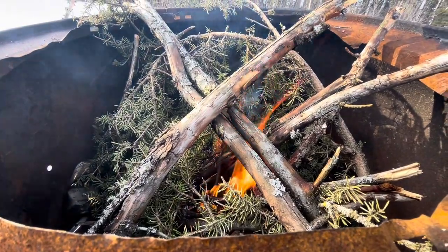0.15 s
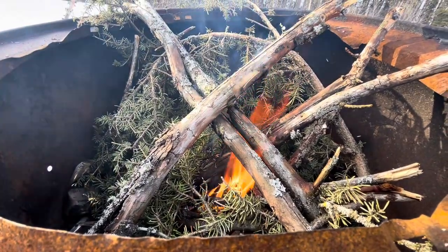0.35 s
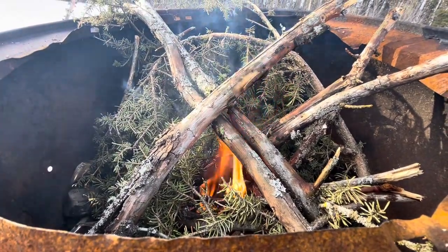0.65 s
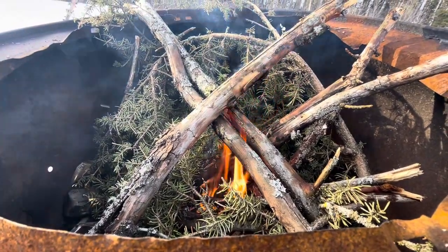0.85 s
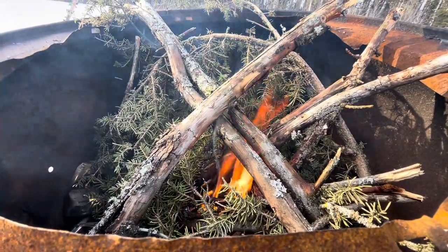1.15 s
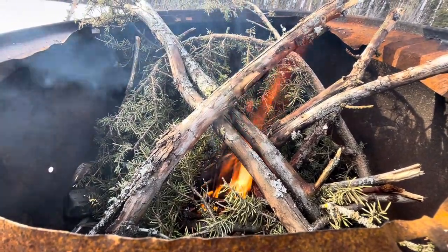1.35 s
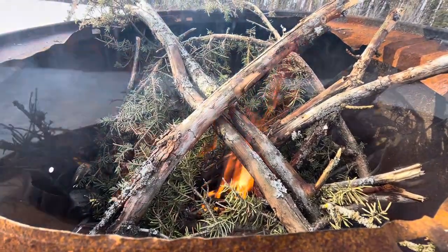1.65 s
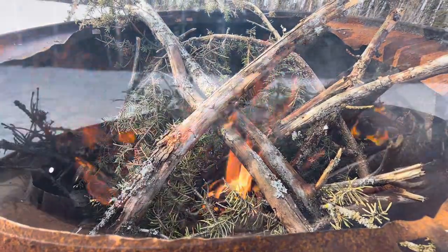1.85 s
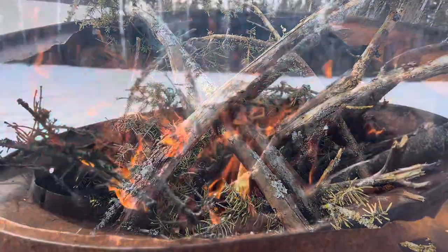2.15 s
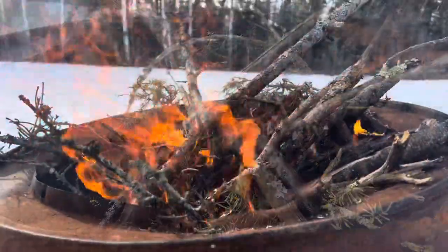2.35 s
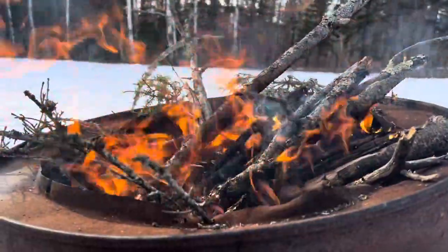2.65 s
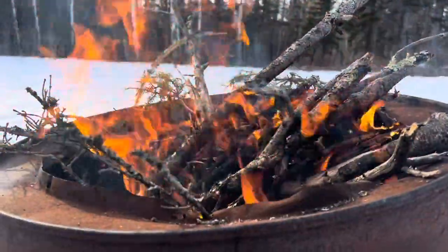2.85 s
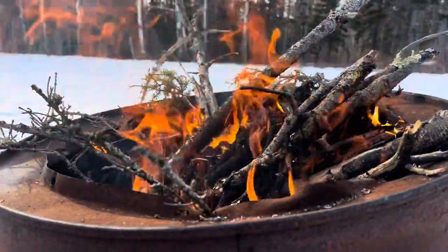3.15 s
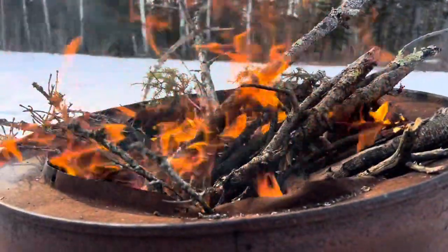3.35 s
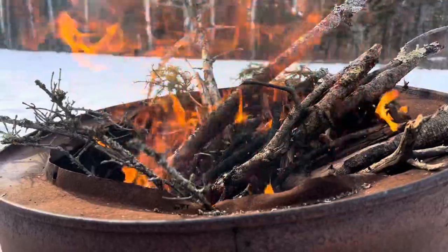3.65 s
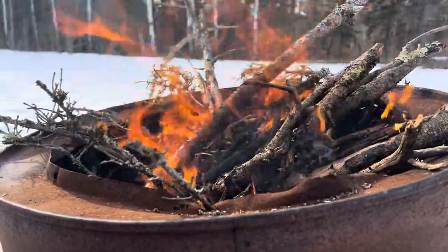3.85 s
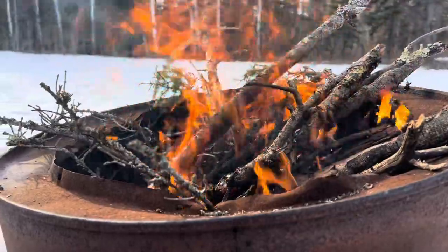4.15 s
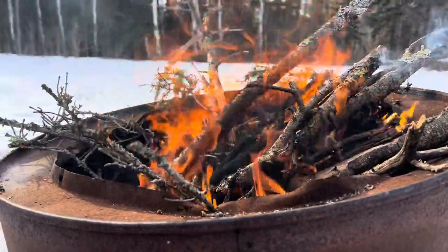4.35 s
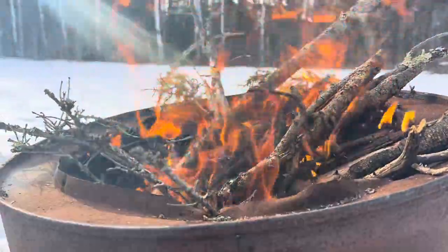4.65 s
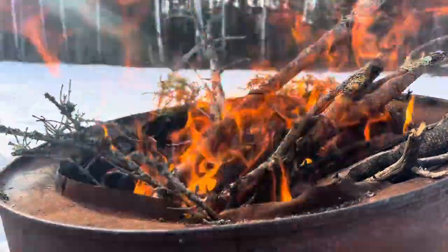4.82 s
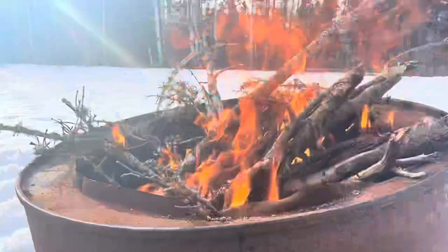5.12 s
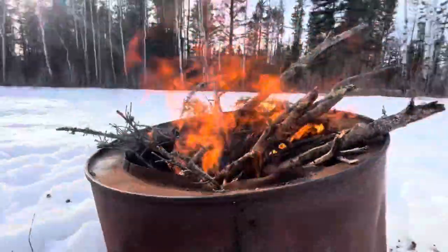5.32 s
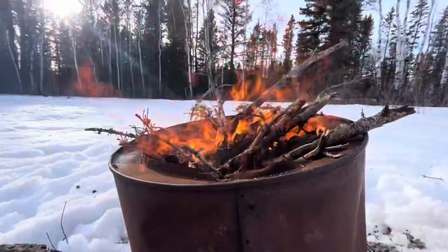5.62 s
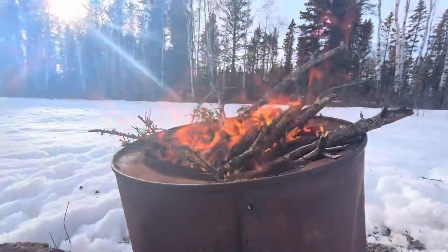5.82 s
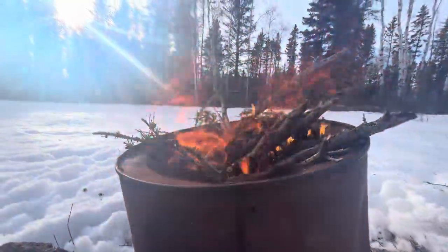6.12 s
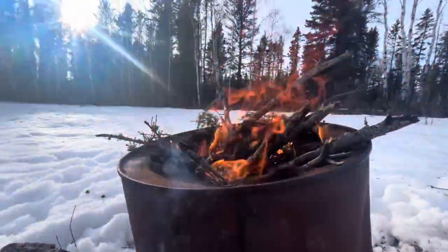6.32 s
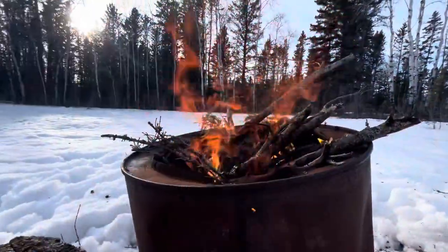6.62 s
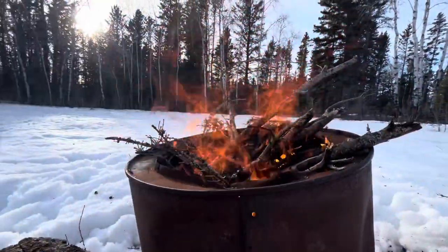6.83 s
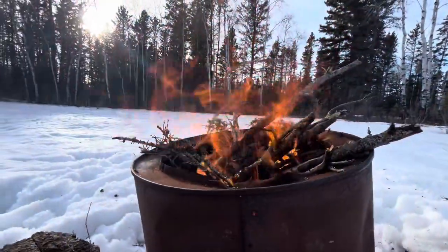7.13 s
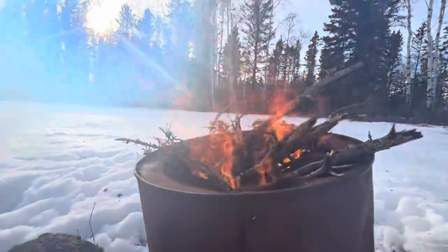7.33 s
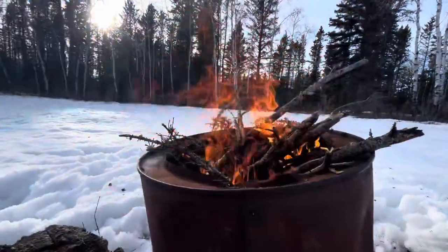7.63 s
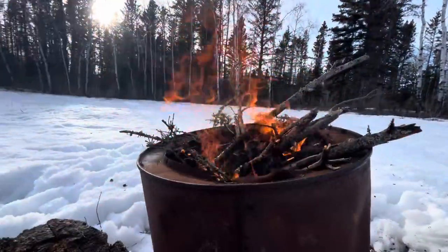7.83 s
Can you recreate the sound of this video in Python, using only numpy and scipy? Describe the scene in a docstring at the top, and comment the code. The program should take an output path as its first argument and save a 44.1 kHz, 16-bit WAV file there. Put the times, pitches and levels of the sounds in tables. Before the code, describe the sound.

A fire of green branches in a steel barrel outdoors, heard in close stereo. From 0 to 1.9 s it is small: a faint steady sap hiss, sparse sharp snaps and needle ticks, dull twig knocks and low soft thumps of air in the barrel, with stronger snaps near 0.9 and 1.5 s. Around 2 s the sound blends into a bigger blaze: loud pops at 2.05 and 2.36 s, dense irregular crackle, airy draught and a deep fluttering roar. The roar gusts from 3.4 s and peaks about 4.1-4.5 s, then drops. From 5.3 s the microphone stands further off; bright pops cluster at 5.4 s, brief flame puffs until 5.8 s. Until 8 s the roar is softer, with scattered crisp snaps, growing fine sizzle, short cloth rubs after 6.1 s and a very faint distant engine hum, ending on a sharp pop.

```python
"""Snaps and ticks crackle over a fluttering roar and a hiss: green branches burn in a steel barrel outdoors.
Needles and bark snap as sharp ticks within rattles; flames, draught and sap are shaped noise that drifts.
Damped swings make the thumps and knocks, noise bands the cloth and steam, sine orders a far engine's hum.
The two-port microphone changes its stance twice and moves away; each stance has its own likeness of the ports."""
import sys
import numpy as np
from scipy import signal
from scipy.fft import rfft, irfft
from scipy.io import wavfile
from scipy.ndimage import uniform_filter1d

SR = 44100
rng = np.random.default_rng(int(sys.argv[2]) if len(sys.argv) > 2 else 0)


def to_wav(s):
    """Save 16-bit WAV."""
    ch = np.atleast_2d(s).T  # columns
    pcm = np.round(np.clip(ch, -1, 1) * 32767)  # PCM
    wavfile.write(sys.argv[1], SR, pcm.astype(np.int16))


N = 351901

# Flames: (time [s], roar level [dB], level of the flutter in the barrel [dB]), flare-ups not included
FLAME_LEVELS = [(0, -71, -68.5), (.5, -57.5, -61), (1.1, -68, -81), (1.7, -64, -61.5), (2.1, -53.5, -48),
                (2.5, -44.5, -43), (3.0, -46.5, -43), (3.6, -39, -41.5), (4.0, -39.5, -42.5),
                (4.45, -32, -37.5), (4.62, -47.5, -44.5), (5.3, -48.5, -51.5), (5.9, -43.5, -47.5),
                (6.3, -56, -49), (6.6, -49, -52), (7.1, -53, -54), (7.5, -49.5, -54.5), (7.97, -60, -53.5)]
# Relative spectra of the flames: (frequency [Hz], density [dB per Hz])
ROAR_SPECTRUM = [(12, -36), (28, -35), (47, -9), (64, 3.5), (95, -1.5), (150, -17), (290, -97.5)]
FLUTTER_SPECTRUM = [(80, -32), (115, 3), (180, 0), (250, -15), (400, -23), (900, -56.5)]
# Flare-ups of gas: (time [s], roar level [dB], length [s])
GAS_FLARES = [(.28, -54, .06), (0.738, -50, 0.033), (1.27, -61, 0.048), (1.605, -47.5, 0.021),
              (2.15, -39.5, 0.033), (2.475, -41, 0.052), (2.784, -34.5, 0.04), (3.212, -35.5, 0.058),
              (3.422, -27, 0.029), (3.884, -29.5, 0.018), (3.996, -30, 0.064), (4.105, -26, 0.065),
              (4.207, -23, 0.034), (4.322, -27, 0.045), (4.786, -37, 0.06), (4.95, -36, 0.12),
              (5.423, -39.5, 0.041), (5.495, -30.5, 0.036), (5.673, -34.5, 0.033), (5.757, -36, 0.05),
              (6.076, -46, 0.033), (6.194, -45, 0.022), (6.463, -44, 0.081), (6.86, -36, 0.066),
              (7.11, -48, 0.029), (7.272, -50, 0.056), (7.616, -42, 0.036)]
FLARE_RISE = 0.42  # rise as a share of the length
FLARE_FLUTTER_DB = -7.5  # flutter of a flare-up against its roar
# Bass turned to the side: (time [s], angle [rad])
BASS_TURN = [(0, .8), (1.7, .6), (2.3, 0), (4.5, 0), (5.4, .3), (6.3, .4), (6.5, .65)]

# Fire bed: (time [s], draught level [dB], sap hiss level [dB], sizzle level [dB])
BED_LEVELS = [(0.0, -73, -64, -73.5), (0.5, -70, -63, -79.5), (1.28, -79, -62.5, -80.5),
              (1.8, -68, -64.5, -73), (2.22, -54, -67.5, -70), (3.65, -51.5, -65.5, -62),
              (4.29, -59, -61.5, -68), (4.82, -56.5, -67, -72), (5.16, -53.5, -62.5, -69.5),
              (5.81, -53, -62, -65.5), (6.52, -54.5, -59, -59), (7.14, -55, -60, -64),
              (7.77, -52, -61.5, -56.5), (7.97, -56.5, -60.5, -52.5)]
# Relative spectra of the bed: (frequency [Hz], density [dB per Hz])
DRAUGHT_SPECTRUM = [(200, 7), (280, 13), (500, 10), (800, 0.5), (1300, -28)]
HISS_SPECTRUM = [(450, -17.5), (850, -7.5), (1080, -0.5), (1550, -2), (1800, -4.5), (2300, -13),
                 (3600, -31.5)]
SIZZLE_SPECTRUM = [(2000, -3), (3000, 4), (6000, 0.5), (9000, -2.5), (13000, -5), (14300, 1.5),
                   (14900, -47), (17000, -63)]
FIRST_HISS_FACTOR = 1.13  # the hiss sits higher by this factor in the first stance

# Engine orders before the fade: (multiple of ENGINE_HZ [1], level [dB])
ENGINE_ORDERS = [(3, -62), (4, -58), (4.25, -66), (5, -63), (5.25, -66), (6, -65), (6.25, -71), (7, -69),
                 (8, -72)]
ENGINE_HZ = 84.05  # mean; it wavers

# Needles that pop clearly: (time [s], peak at the left port before the stance colours it [dB])
NEEDLE_POPS = [(0.094, -40.5), (0.125, -45), (0.9263, -38.5), (0.9988, -31), (1.286, -44.5), (2.058, -21),
               (2.1778, -32), (2.311, -35), (2.343, -39), (2.455, -35), (2.4644, -38), (2.531, -23),
               (2.875, -34), (2.889, -38), (3.0125, -36), (3.486, -43), (3.524, -31), (3.5834, -39),
               (3.593, -33), (3.6275, -37), (3.8354, -51), (3.891, -36), (3.9695, -34), (3.976, -32),
               (4.111, -37), (4.317, -46), (4.3894, -28.5), (4.4204, -46), (4.6735, -40), (4.7598, -27),
               (4.789, -37), (4.8855, -39), (5.0025, -43), (5.171, -37), (5.3185, -35), (5.342, -37),
               (5.3555, -36), (5.4194, -22.5), (5.427, -23), (5.53, -33), (5.726, -37), (5.738, -34.5),
               (5.7546, -36), (5.84, -41), (5.8614, -31), (5.946, -39), (6.039, -37), (6.0465, -37),
               (6.1275, -34), (6.381, -35), (6.854, -32), (7.019, -28), (7.0253, -32), (7.0718, -33),
               (7.137, -39), (7.3656, -34), (7.383, -38), (7.5874, -39), (7.7764, -28), (7.9765, -21)]
# Faint ticks against the sizzle, one entry a stance: level [dB]
FAINT_TICKS_DB = [-12, 0, -2]

# Dull knocks of twigs: (time [s], starting level of the decay [dB], frequency [Hz])
TWIG_KNOCKS = [(0.049, -41.5, 448), (.144, -48, 417), (.329, -37, 800), (0.403, -46, 500),
               (0.544, -50, 450), (0.758, -33.5, 930), (1.144, -52.5, 402), (1.205, -38, 352),
               (1.376, -35, 820), (2.294, -23.5, 895), (2.493, -32, 1610), (4.512, -21, 300),
               (5.271, -20, 1100), (5.311, -25.5, 960), (6.847, -23, 177), (7.394, -28.5, 1000)]
KNOCK_CYCLES = 4.5  # swings to die by 60 dB
# Thumps of the air column: (time [s], starting level of the decay [dB])
GAS_THUMPS = [(0.138, -48), (0.29, -27), (.319, -32), (0.517, -39), (0.579, -33.5), (0.778, -35.5),
              (0.885, -37.5), (0.985, -45), (1.147, -44.5), (1.209, -44.5), (1.486, -39), (1.543, -40.5),
              (1.616, -38), (1.786, -29)]
THUMP_HZ, THUMP_T60 = 151, 0.093  # Hz, s

# Loud snaps: (time [s], level before colour [dB], brightness [dB per octave],
# woody knock relative [dB], first tick relative [dB])
LOUD_SNAPS = [(0.2716, -38, 1, -2, -2), (0.443, -45, -3, -3, 1), (0.4868, -38.5, 12, -12, 8),
              (0.5086, -36, -1.5, -9, 7), (0.6197, -43, 3, -5.5, 7.5), (0.879, -30, 0.5, -7, 3),
              (0.983, -28, 9.5, -12.5, 2.5), (1.4295, -44.5, 11.5, -3.5, -4), (1.476, -24, 3, -12, -20),
              (1.6008, -33, 7, -17, 12.5), (1.6089, -29.5, 5, -14.5, 6), (1.664, -51.5, -1, -10, 2),
              (1.7398, -46.5, 1, -10, 7), (1.7608, -38.5, 5, -11, -1), (1.779, -35.5, 5, -5, -1),
              (1.912, -46.5, 3, -21, 8), (2.0481, -32.5, 5.5, -0.5, -11), (2.162, -35, 3.5, -12.5, 6),
              (2.2536, -50, -4, 0, -5), (2.272, -41, 2, -9, -10), (2.3197, -37, 0.5, -15, 10),
              (2.35, -31.5, 6, -24, 2), (2.3586, -23.5, 3, -14.5, 6.5), (2.4084, -58, 9, -14, 6),
              (2.5385, -34.5, -4.5, -17, 8), (2.562, -39.5, -4.5, -22, -5), (2.628, -49, 0, -9, 8),
              (2.646, -27.5, -3, -1.5, 9), (2.7144, -34.5, -1, -22, 7), (2.791, -34.5, -15, 5.5, 5),
              (2.87, -53, -13, 9.5, 8), (2.973, -54.5, -12, 8, -5), (2.9844, -39, -3, -16, -1),
              (3.0364, -39.5, -0.5, -17, 8), (3.0876, -30, 1.5, -10, 7), (3.1601, -38, 4, -20, -10),
              (3.1997, -31.5, -0.5, -17, 2), (3.229, -45, 6, -15, 4), (3.3428, -27, -1, -35, 6.5),
              (3.3643, -47, 0, 0, -1), (3.4138, -41, -0.5, -13, 1), (3.425, -25.5, -0.5, -15, 4),
              (3.444, -41.5, -5, -26, 4), (3.469, -46.5, 4, -16, 2), (3.534, -35, 1.5, -17, 10.5),
              (3.563, -38, -1, -18, 9.5), (3.6059, -48, 4, -4, 1), (3.6795, -28.5, 1.5, -28, -9),
              (3.7105, -39, 5, -22, 6.5), (3.7415, -40.5, -1.5, -19, 7), (3.9117, -22.5, 3, -25, 1.5),
              (3.9285, -31, 4.5, -11, 8.5), (3.9582, -41, -5.5, -3, -8), (4.141, -41, 1, -1, 1.5),
              (4.216, -48, -2, -5, -2), (4.231, -45.5, 2, -9, -2), (4.287, -33.5, 7.5, -7.5, -10),
              (4.3573, -45, 2, -8, -1), (4.3776, -48, -1, 10.5, 3.5), (4.4587, -51, 10, -17, 0),
              (4.4685, -37, 6, -6, -3), (4.51, -41, -3, 0, 6), (4.5579, -38, 4.5, -19, 3),
              (4.5661, -39, 3.1, -21, -5), (4.5878, -47, 8, -20, -3), (4.6158, -48, 6, -9, 3),
              (4.801, -40, 5.5, -4, 2.5), (4.9735, -47.5, 1, -20, 2), (5.0195, -35, 1.5, -6.5, 1.5),
              (5.0928, -43.5, 5, -6, -1), (5.1164, -43, 1.4, -7, 1), (5.135, -37, 6, -19, -3),
              (5.189, -37, 4, -12, 1), (5.199, -47, -1, 0, 3), (5.2195, -36.5, 4, -12, -7),
              (5.414, -36, 10, -16, 1), (5.5457, -35, 1.5, -21, 1), (5.574, -42.5, 0, -2, -4),
              (5.6076, -40, 4, -6.5, 8), (5.635, -45, 1, -5, -4), (5.6826, -45.5, -2, -3, 7),
              (5.808, -44.5, 10.5, -1.5, -1), (5.8483, -47.5, 1, 1.5, 7.5), (5.9192, -48.5, -1, -15, -4),
              (5.9719, -35, -2, -26, 5.5), (5.9961, -41.5, -3.5, -21, 5), (6.063, -45.5, 2, -3, -3),
              (6.1674, -43, -5, -10, 10.5), (6.1831, -24.5, 2.5, -29, -9), (6.1985, -43, 3, -7, 8),
              (6.2165, -44.5, 3, -26, 0), (6.322, -43, 1, -4, -9), (6.4033, -40, -1.5, -11.5, 11),
              (6.499, -47.5, 13, -14, 3), (6.587, -49.5, 10, -19, 4), (6.6078, -36, -1.5, -21, 6),
              (6.6642, -32, 1, -5, -19), (6.681, -35, 0, -29, -11), (6.6915, -40, 2, -11, 1),
              (6.719, -42, -1.2, -7, -1), (6.765, -29, 6, -14.5, 14.5), (6.786, -46.5, 1, -5, -2),
              (7.0086, -34.5, 6, -22, 4), (7.061, -46.5, 2, -4, -6), (7.1068, -41.5, 6, -23, 2),
              (7.1581, -43, -1, -4, -7), (7.262, -40, 1, -27, -7), (7.3002, -41, -4, -35, 13.5),
              (7.3095, -39, 4, 1.5, -4), (7.351, -45.5, -7, -30, 2), (7.4245, -31, -4.5, -26, 17),
              (7.5437, -40.5, 3, -8, 11), (7.5988, -45, 6, -5, 1), (7.7447, -39.5, 5, -2.5, 2),
              (7.7653, -32.5, -5.5, -20, 8), (7.8799, -29, -2, -14, 6)]
# Bands of a burst, the woody one first: (centre [Hz], factor on t60 [1], colour of loud snaps [dB])
SNAP_BANDS = [(1000, 1.41, 3), (3060, 1.51, -3.5), (6860, 1.174, 5), (14470, 0.59, 8.5)]
# Ring time of a snap at the usual level, one entry a stance: t60 [s], before the band factor
STANCE_T60 = [0.025, 0.015, 0.02]
# Added to the three upper bands of a snap, one row a stance: (lower [dB], middle [dB], top [dB])
STANCE_COLOUR = [(0, 0, -6.5), (0, 0, 0.5), (0, 2, -4.5)]
PIVOT_HZ = 7000  # brightness tilts the colour about this frequency
LINGER_PER_DB, USUAL_DB = 0.0036, -44  # louder snaps ring slightly longer, counted from the usual level

# Small jets of steam from split branches: (time [s], length [s], level [dB], centre [Hz], width [Hz])
STEAM_JETS = [(4.03, .25, -68, 4700, 400), (6.322, .04, -54, 1900, 300)]
# Cloth rubs: (time [s], length [s], low band level [dB], high band level [dB])
CLOTH_RUBS = [(6.113, 0.079, -46.5, -50), (6.406, 0.15, -49, -44.5), (6.827, 0.18, -58, -51),
              (7.677, 0.13, -42.5, -49.5), (7.775, 0.073, -48.5, -48.5)]
# The low and the high band of the cloth: (centre [Hz], width [Hz])
CLOTH_BANDS = [(1150, 710), (5600, 3400)]

# Frequencies at which the ports are described: frequency [Hz]
PORT_FREQUENCIES = [300, 1400, 2400, 3500, 7500, 9600, 12700, 16000]
# Microphone stances: (start [s], list of left-right likeness [1], list of left-right level [dB]),
# both lists read at PORT_FREQUENCIES
MIC_STANCES = [(0, [.6, .5, -.15, -.5, .2, .45, .985, .88], [2, 6.5, 5.5, 2, 1.5, -5, 0, -.6]),
               (1.95, [.995, .65, .8, .7, .95, .99, .985, .94], [0, 2, 0, 2.2, 1.2, 0, 0, 0]),
               (5.3, [.4, .2, .1, -.45, .25, .3, .985, .88], [1.5, 9, 1.5, 0, -2.2, -10, 0, -.6])]
LAG_S, LAG_FROM_HZ = 7 / 44100, 6400  # above that frequency the left port lags
EDGE_HZ = 16500  # band limit


def amp(db):
    """Decibels to gain."""
    return 10 ** (np.asarray(db) / 20)


def evened(x):
    """Scales to rms 1."""
    return x / np.sqrt(np.mean(x ** 2) + 1e-20)


def read(points, hz):
    """Reads a spectrum on a log-frequency axis."""
    f, value = np.transpose(points)
    return np.interp(np.log(hz + 1), np.log(f + 1), value)


def curve(rows, axis):
    """One column of a curve, sample by sample."""
    return np.interp(np.arange(N) / SR, [r[0] for r in rows], [r[axis] for r in rows])


def stance_at(t):
    """Index of the microphone's stance at time t."""
    return np.searchsorted([row[0] for row in MIC_STANCES], t, "right") - 1


def noise(spectrum, size, patchy_db):
    """Two unrelated noises of one spectrum with shared patches that drift in time and frequency."""
    hop = size // 4
    hz = np.fft.rfftfreq(size, 1 / SR)
    frames = N // hop + 5
    a, b, c, d, patches = rng.standard_normal((frames, len(hz), 5)).T
    patches = uniform_filter1d(patches, size=5, axis=0)
    patches = evened(uniform_filter1d(patches, size=6, axis=1))
    gain = amp(read(spectrum, hz)[:, None] + patchy_db * patches)
    pair = np.array([a + 1j * b, c + 1j * d]) * gain
    return evened(signal.istft(pair, nperseg=size, noverlap=size - hop)[1][:, :N])


def steadied(x, size, share):
    """Takes part of the slow chance swells out of a noise."""
    power = uniform_filter1d(x ** 2, size, axis=1)
    return evened(x / (power + 0.046) ** (share / 2))


def flares():
    """Each flare-up of gas swells quickly and sinks away."""
    t = np.arange(0, N + 50, 50) / SR
    surge = 0
    for s, db, length in GAS_FLARES:
        spread = np.where(t < s, FLARE_RISE * length, length)
        surge = surge + amp(db) * np.exp(-((t - s) / spread) ** 2)
    return np.interp(np.arange(N) / SR, t, surge)


def flames():
    """Turbulent burning: a deep roar and a lumpy flutter in the barrel's air column."""
    surge = flares()
    # steady burning and flare-ups add as powers
    roar_gain = np.hypot(amp(curve(FLAME_LEVELS, axis=1)), surge)
    flutter_gain = np.hypot(amp(curve(FLAME_LEVELS, axis=2)), amp(FLARE_FLUTTER_DB) * surge)
    roar = roar_gain * steadied(noise(ROAR_SPECTRUM, size=2048, patchy_db=3.0), size=3000, share=0.43)
    flutter = flutter_gain * steadied(noise(FLUTTER_SPECTRUM, size=1024, patchy_db=4), size=3000, share=0.68)
    mid, side = roar + flutter
    side = side * np.tan(curve(BASS_TURN, axis=1))
    return np.array([mid + side, mid - side])


def bed():
    """Draught, boiling sap and fine sizzle: three bands of noise, the sizzle spitting unevenly."""
    draught = amp(curve(BED_LEVELS, axis=1)) * noise(DRAUGHT_SPECTRUM, size=1024, patchy_db=4.5)
    raised = [(hz * FIRST_HISS_FACTOR, db) for hz, db in HISS_SPECTRUM]
    first_hiss = noise(raised, size=512, patchy_db=1.5)
    later_hiss = noise(HISS_SPECTRUM, size=512, patchy_db=1.5)
    in_first = stance_at(np.arange(N) / SR) == 0
    hiss = amp(curve(BED_LEVELS, axis=2)) * np.where(in_first, first_hiss, later_hiss)
    # the sizzle spits in short clumps and lulls now and then
    clumps = rng.exponential(1, N // 100 + 1) ** 2 - 2
    lulls = rng.standard_normal(len(clumps))
    spit_db = 3.06 * evened(uniform_filter1d(clumps, size=4))
    spit_db = spit_db + 2.1 * evened(uniform_filter1d(lulls, size=20))
    sizzle_db = curve(BED_LEVELS, axis=3) + np.repeat(spit_db, 100)[:N]
    return draught + hiss + amp(sizzle_db) * noise(SIZZLE_SPECTRUM, size=256, patchy_db=4.5)


def hum():
    """Wavering orders of a far engine, clearer once the fire is further off."""
    waver = evened(uniform_filter1d(rng.standard_normal(N), size=9000))
    turns = ENGINE_HZ * np.cumsum(1 + 0.0013 * waver) / SR
    apart = np.array([[.7], [-.7]])  # phase at the two ports (rad)
    tones = 0
    for k, db in ENGINE_ORDERS:
        tones = tones + amp(db) * np.sqrt(2) * np.sin(2 * np.pi * (k * turns + rng.random()) + apart)
    return tones * np.interp(np.arange(N) / SR, [1.8, 2.4, 5.2, 5.6], [0.079, 0.3, 0.89, 1.0])


def bursts(band_db, t60, tick_db):
    """Each is a sharp tick inside a rattle of splinters and reflections; each band dies at its own speed."""
    size, count = 4096, len(t60)
    t, hz = np.arange(size) / SR, np.fft.rfftfreq(size, 1 / SR)
    rattle = rfft(rng.standard_normal((count, 2, size)))
    delay = rng.uniform(0.000808, 0.0012, (count, 1, 1))  # s
    tick = rng.choice([-1., 1.], (count, 2, 1)) * np.exp(-2j * np.pi * hz * delay)
    corners = [220] + [f for f, _, _ in SNAP_BANDS] + [14600, 16400]
    rise = 1 - np.exp(-(t / 0.0014) ** 2)
    out = np.zeros((count, 2, size))
    for k, (_, ring_time, _) in enumerate(SNAP_BANDS):
        share = np.eye(len(corners))[k + 1]
        if k == 3:
            share[-2] = 1  # the top band reaches on to 14600 Hz
        band = np.sqrt(read(list(zip(corners, share)), hz))  # neighbours cross over in power
        fall_db = -60 * t / np.maximum(ring_time * t60, .004)[:, None, None]
        shape = rise * (amp(fall_db) + amp(-27.5 + 0.33 * fall_db))  # with a weak, slower tail
        click = irfft(tick * band)
        click = amp(tick_db)[:, None, None] * click / abs(click).max()
        out += amp(band_db[:, k, None, None]) * (evened(irfft(rattle * band)) * shape + click)
    return out


def needles(count):
    """So many short dry ticks, each with a colour of its own."""
    chance = rng.random((count, 6))
    colour_db = np.array([-11.5, -13, -2.0, 3.5]) + 7.0 * (chance[:, :4] - .5)
    return bursts(colour_db, 0.0079 + 0.014 * chance[:, 4], -2.5 + 12.4 * chance[:, 5])


def crackle(per_s=150, spread_db=3.0):
    """Faint random ticks of needles, their level following the sizzle, and the clear pops among them."""
    kinds = needles(count=16)
    struck = rng.random(N) < per_s / SR
    size = amp(spread_db * np.minimum(rng.exponential(1, N), 2.2)) * struck
    kind = rng.integers(0, len(kinds), N)
    ticks = 0
    for k, tick in enumerate(kinds):
        ticks = ticks + signal.oaconvolve((size * (kind == k))[None], tick, axes=1)[:, :N]
    pops = np.zeros((2, N + 4096))
    for (s, db), pop in zip(NEEDLE_POPS, needles(count=len(NEEDLE_POPS))):
        at = round((s - .0007) * SR)
        pops[:, at:at + pop.shape[1]] += amp(db) * pop / abs(pop[0]).max()
    ticks_db = np.take(FAINT_TICKS_DB, stance_at(np.arange(N) / SR)) + curve(BED_LEVELS, axis=3)
    return amp(ticks_db) * ticks + pops[:, :N]


def ring(s, db, hz, t60, rise, turn):
    """One damped swing placed at time s, its phase turned apart at the two ports."""
    out, at, t = np.zeros((2, N)), round(s * SR), np.arange(0, 2 * t60, 1 / SR)
    shape = amp(db - 60 * t / t60) * (1 - np.exp(-t / rise))
    out[:, at:at + len(t)] = shape * np.sin(2 * np.pi * hz * t + np.array([[turn], [-turn]]))
    return out


def thuds():
    """Twigs knock dully as they settle; puffs of gas thump the barrel's air column."""
    knocks = sum(ring(s, db, hz, KNOCK_CYCLES / hz, rise=0.00027, turn=0.56) for s, db, hz in TWIG_KNOCKS)
    return knocks + sum(ring(s, db, THUMP_HZ, THUMP_T60, rise=0.0031, turn=0.47) for s, db in GAS_THUMPS)


def snaps():
    """The loud snaps: one colour, tilted by each snap's brightness, over its woody knock."""
    s, level_db, bright_db, wood_db, tick_db = np.transpose(LOUD_SNAPS)
    hz, _, colour_db = np.transpose(SNAP_BANDS)
    stance = stance_at(s)
    upper_db = bright_db[:, None] * np.log2(hz[1:] / PIVOT_HZ) + np.array(STANCE_COLOUR)[stance]
    band_db = level_db[:, None] + colour_db + np.c_[wood_db, upper_db]
    t60 = np.take(STANCE_T60, stance) * np.exp(LINGER_PER_DB * (level_db - USUAL_DB))
    out = np.zeros((2, N + 4096))
    for start, burst in zip(s, bursts(band_db, t60, tick_db)):
        at = round((start - .0007) * SR)
        out[:, at:at + burst.shape[1]] += burst
    return out[:, :N]


def swell(s, length, db, hz, width):
    """A ragged swell of noise in one band."""
    out, at = np.zeros((2, N)), round(s * SR)
    shape = signal.windows.tukey(round(length * SR), .75)
    sos = signal.butter(3, [hz - width / 2, hz + width / 2], "bandpass", fs=SR, output="sos")
    ragged_db = 2.5 * evened(uniform_filter1d(rng.standard_normal(len(shape)), size=250))
    hiss = evened(signal.sosfilt(sos, rng.standard_normal((2, len(shape)))))
    out[:, at:at + len(shape)] = amp(db + ragged_db) * shape * hiss
    return out


def swishes():
    """Small jets of steam hiss in one band; cloth rubs on cloth in two broad bands."""
    out = sum(swell(*row) for row in STEAM_JETS)
    for s, length, *levels_db in CLOTH_RUBS:
        for (hz, width), db in zip(CLOTH_BANDS, levels_db):
            out = out + swell(s, length, db, hz, width)
    return out


def ports(pair):
    """The right port hears part of the left one's sound, earlier in the treble, plus a part of its own."""
    hz, t, (left, own) = signal.stft(pair, SR, nperseg=256, noverlap=192)
    stance = stance_at(t)
    likeness = [np.interp(hz, PORT_FREQUENCIES, row) for _, row, _ in MIC_STANCES]
    like = np.clip(likeness, -1, 1)[stance].T
    # each port takes half of the level difference
    tilt = amp([np.interp(hz, PORT_FREQUENCIES, db) / 2 for _, _, db in MIC_STANCES])[stance].T
    lead = np.exp(2j * np.pi * LAG_S * np.maximum(hz - LAG_FROM_HZ, 0))[:, None]
    right = like * left * lead + np.sqrt(1 - like ** 2) * own
    return signal.istft(np.array([left * tilt, right / tilt]), SR, nperseg=256, noverlap=192)[1][:, :N]


def scene():
    """The fire and its surroundings at the two ports."""
    return flames() + ports(bed() + crackle() + snaps() + swishes()) + hum() + thuds()


def record(dry):
    """The band limit: a steep low-pass."""
    lowpass = signal.firwin(511, EDGE_HZ, window=("kaiser", 9), fs=SR)
    return signal.oaconvolve(dry, lowpass[None], "same")


dry = scene()
out = record(dry)
to_wav(out)
```